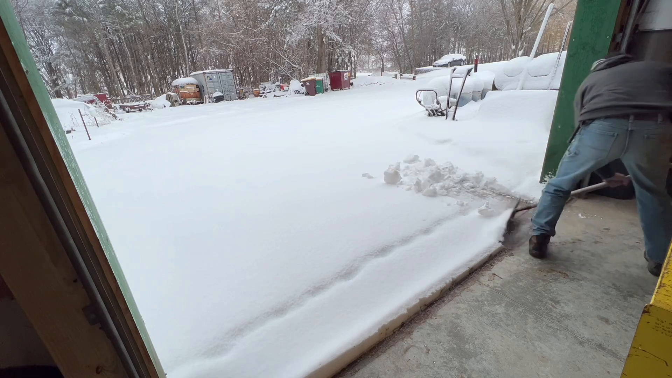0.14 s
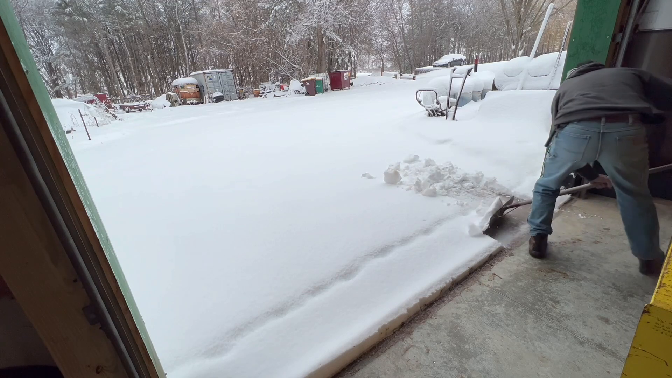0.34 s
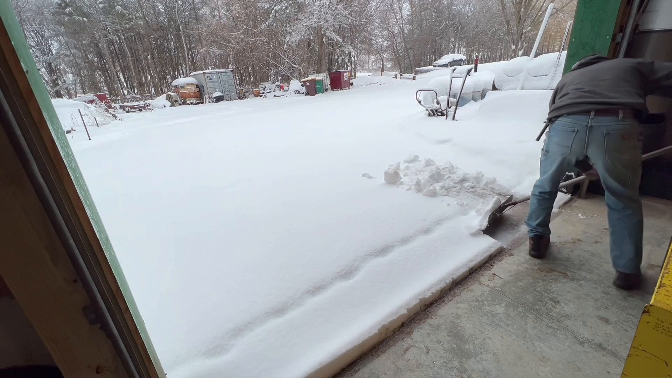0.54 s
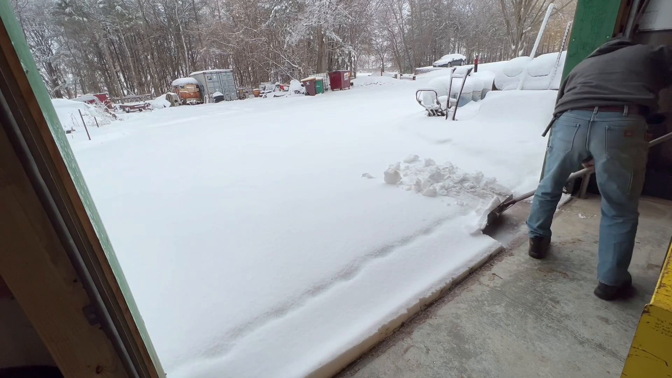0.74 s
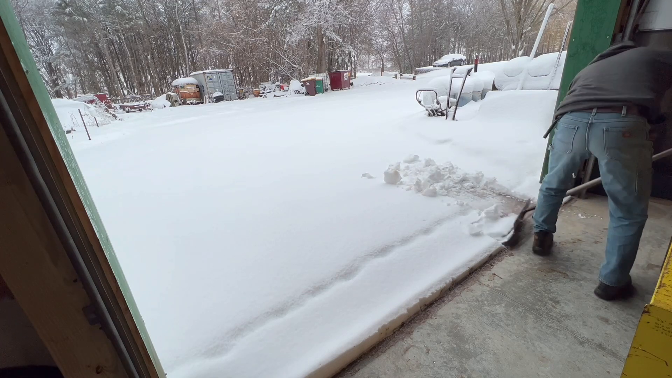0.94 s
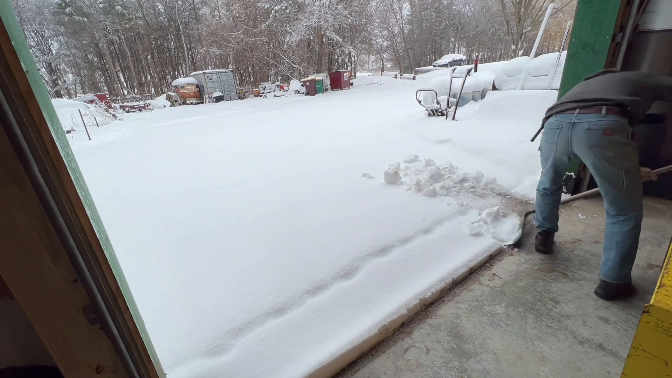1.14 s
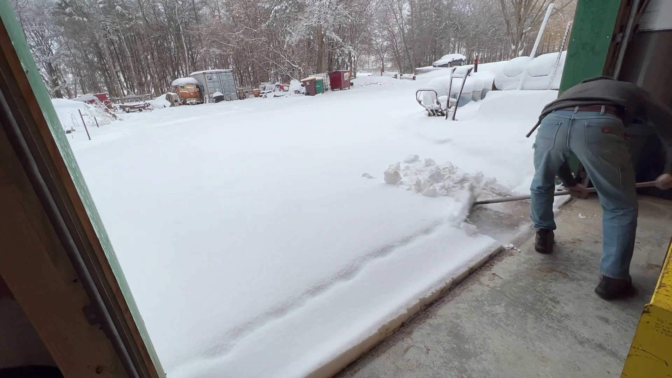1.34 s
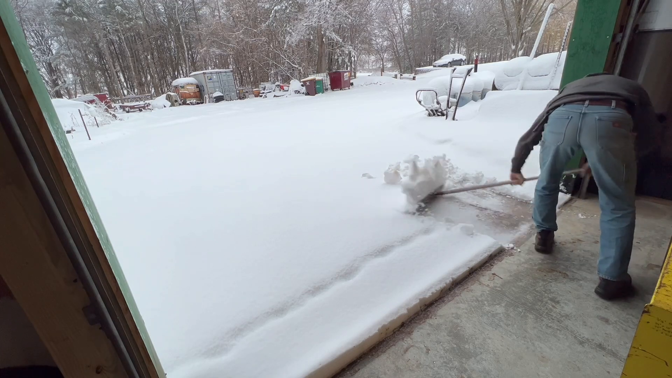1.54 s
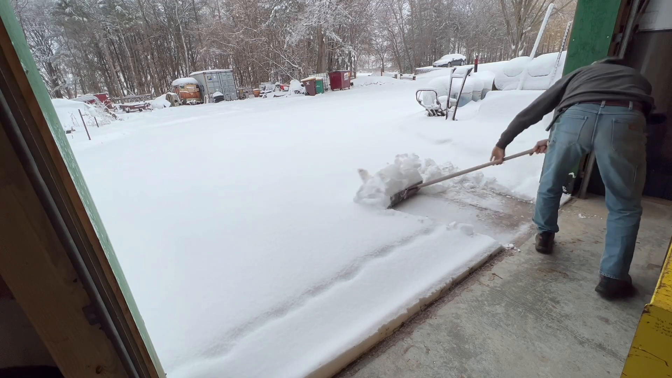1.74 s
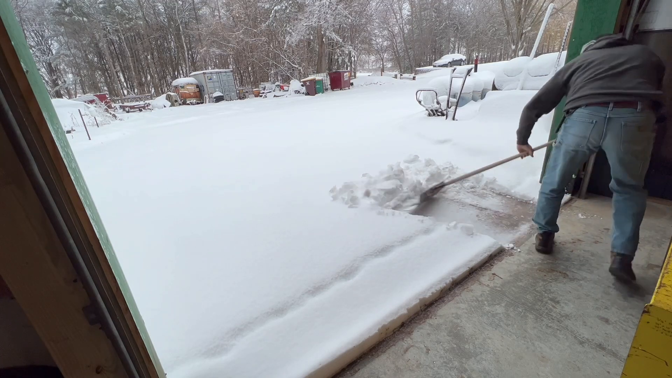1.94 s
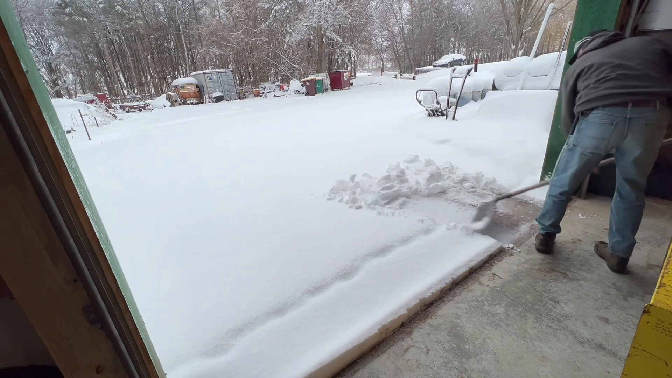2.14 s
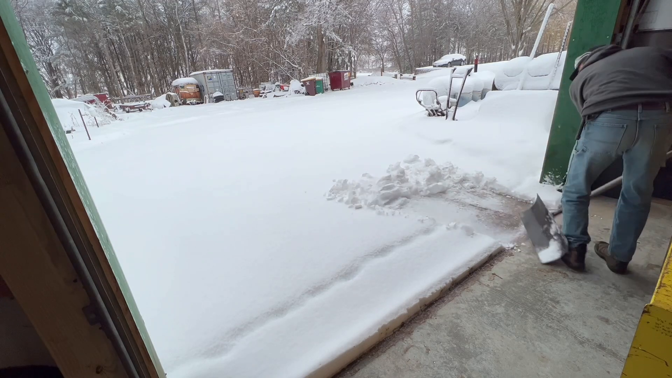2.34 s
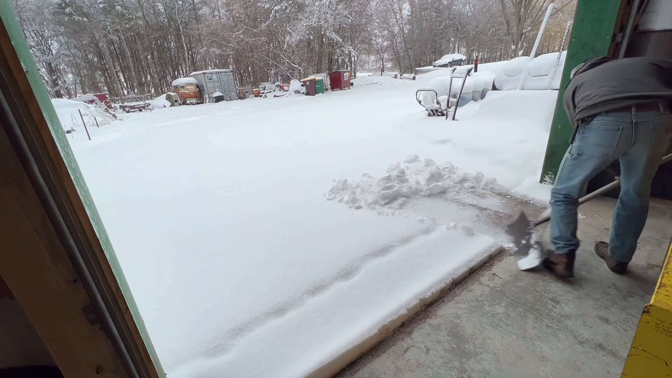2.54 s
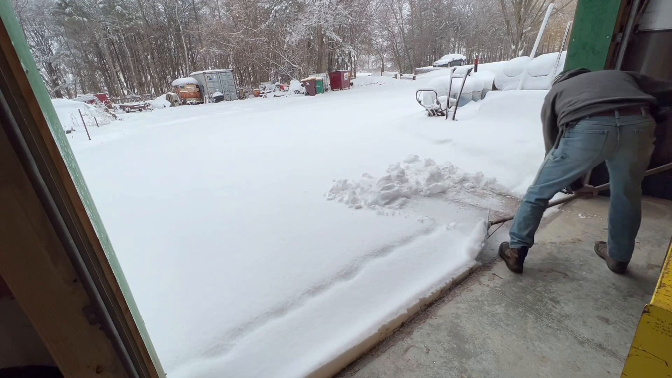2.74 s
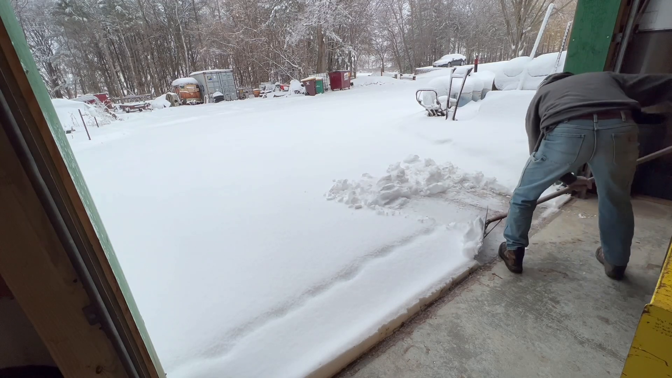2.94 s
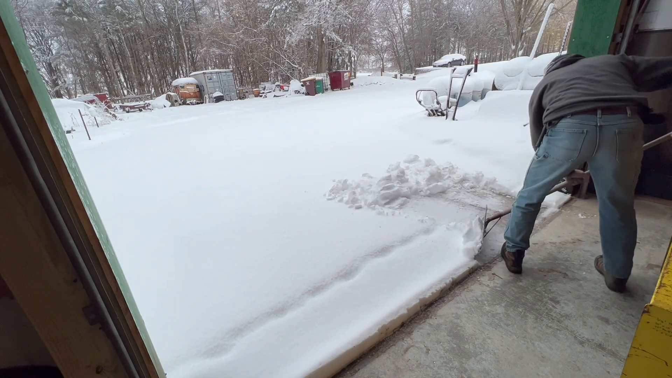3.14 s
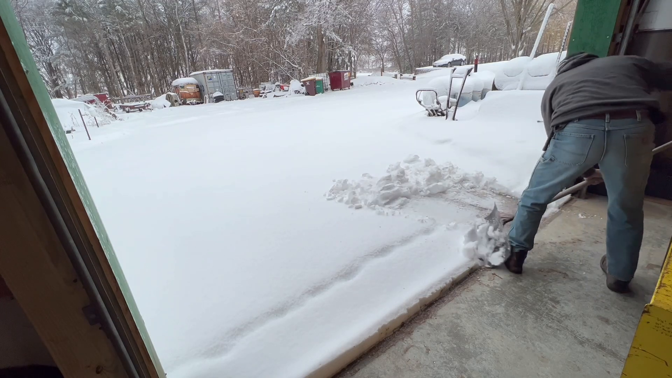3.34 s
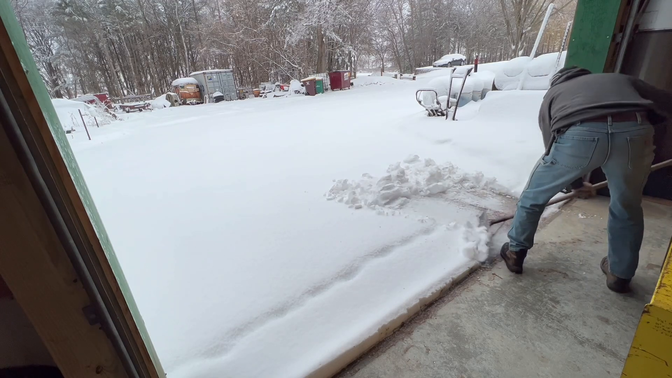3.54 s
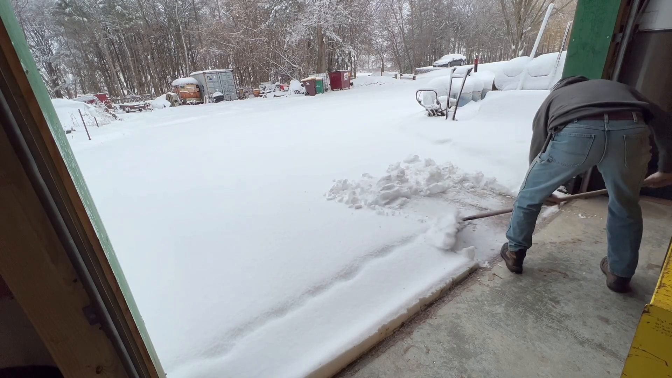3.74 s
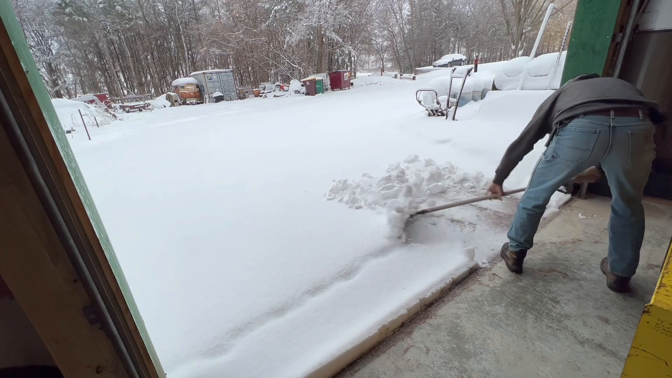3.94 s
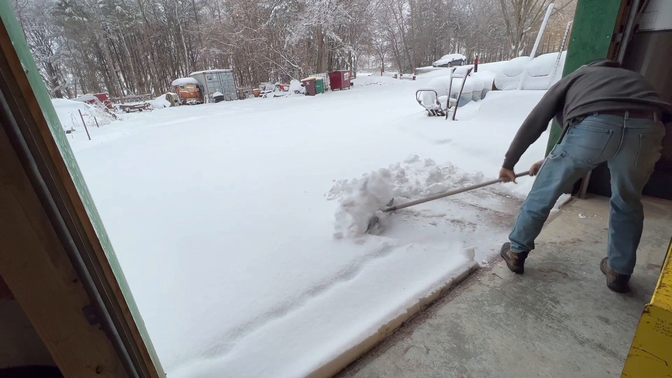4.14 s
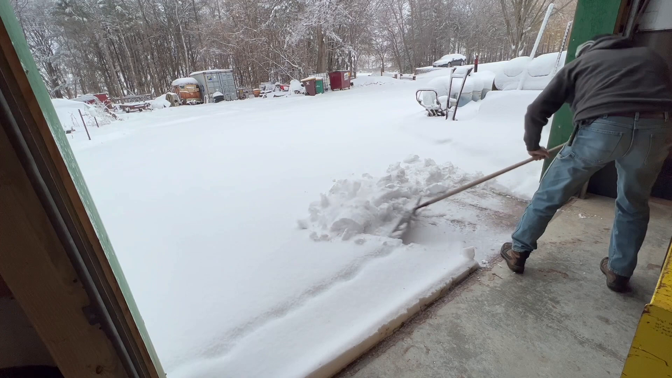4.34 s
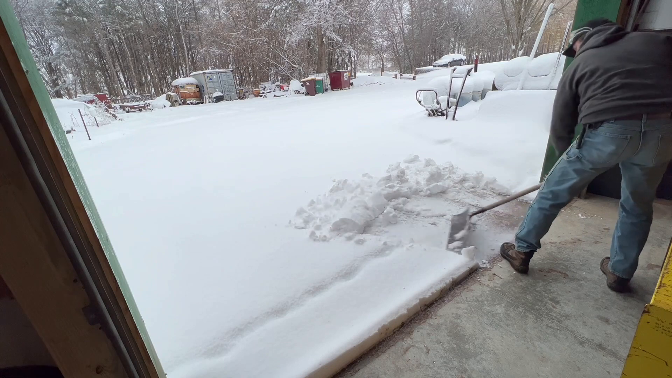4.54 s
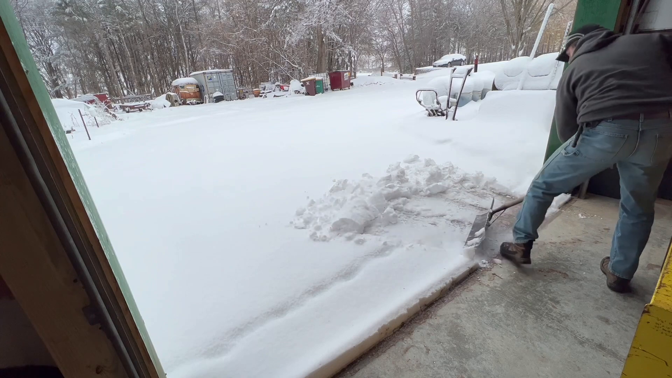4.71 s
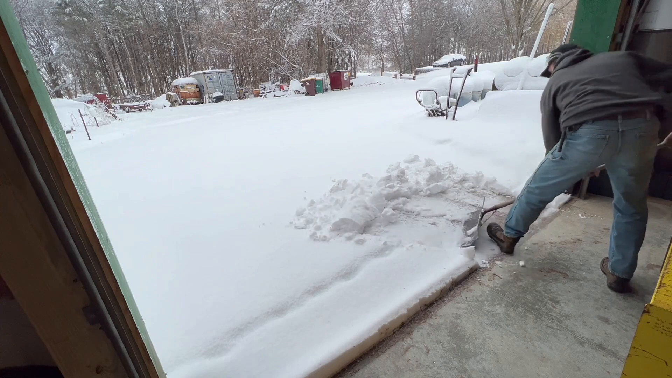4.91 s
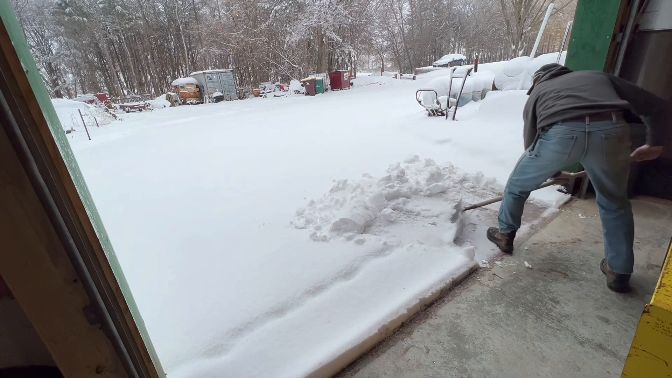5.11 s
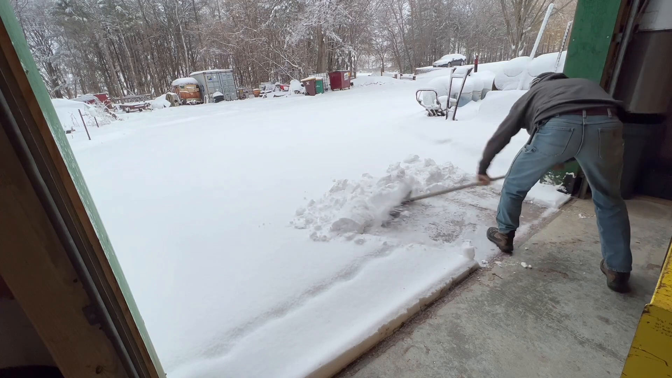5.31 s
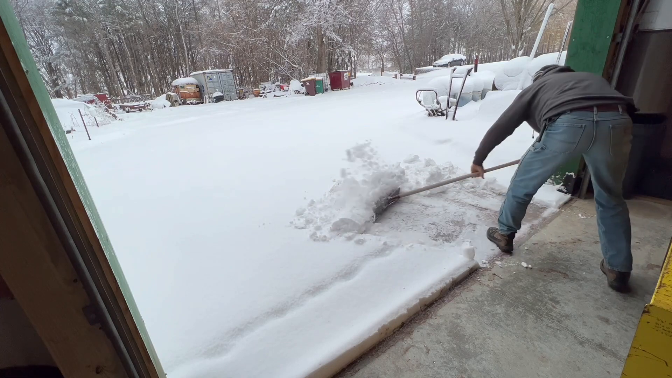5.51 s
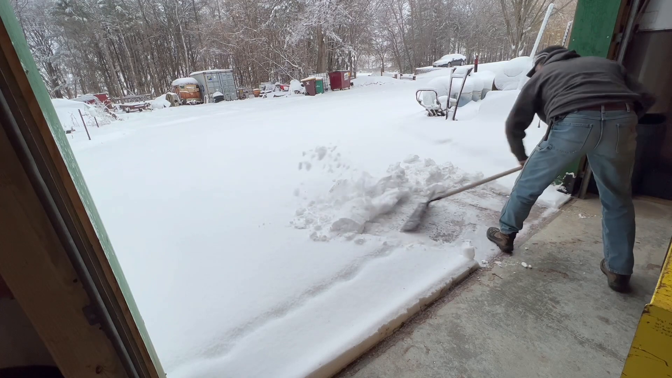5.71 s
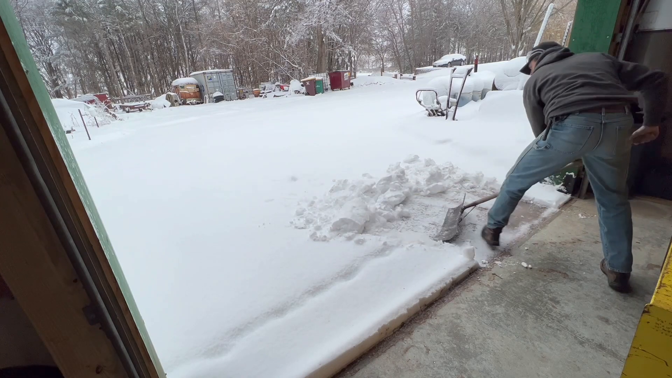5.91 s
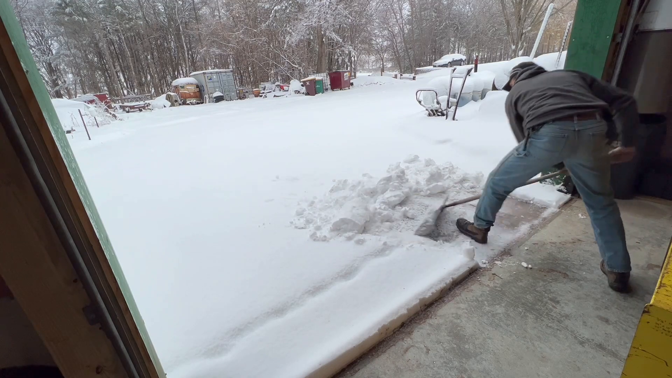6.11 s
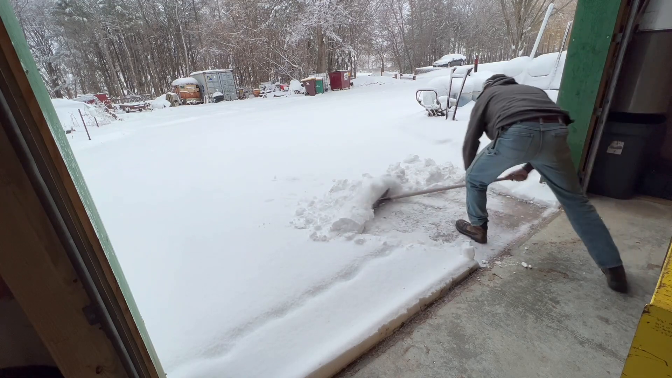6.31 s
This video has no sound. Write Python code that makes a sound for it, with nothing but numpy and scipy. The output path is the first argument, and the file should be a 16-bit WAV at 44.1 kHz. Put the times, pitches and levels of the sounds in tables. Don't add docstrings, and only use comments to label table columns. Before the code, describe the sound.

Rough, ringing shovel strokes rasp over a concrete slab and push crunchy snow, with soft boot thuds and one low hollow bump.

```python
import sys
import numpy as np
from scipy import signal
from scipy.fft import rfft, irfft, next_fast_len
from scipy.io import wavfile

SR = 44100
rng = np.random.default_rng(int(sys.argv[2]) if len(sys.argv) > 2 else 0)


def generate_wav(signal):
    frames = np.transpose(np.atleast_2d(signal))
    scaled = np.clip(frames, -1, 1) * 32767
    pcm = np.round(scaled).astype(np.int16)
    wavfile.write(sys.argv[1], SR, pcm)


def undo_db(level):
    steps = np.asarray(level, float) / 20
    return 10 ** steps


N = 285327

# time in seconds, edge contact in dB,
# snow load in dB against the contact.
SILL_PUSHES = [
    [(0, -19.5, -45), (.034, -16, -22.5), (.17, -24, -4.5), (.254, -32, 8), (.388, -72, -6),
     (.42, -74, -15)],
    [(.854, -37.5, -5), (.894, -30.5, -21), (.972, -29, -9.5), (1.024, -38.5, -10), (1.078, -52, 7),
     (1.1, -64, 1)],
    [(1.08, -41, 6), (1.134, -24.5, -13.5), (1.218, -23.5, -1), (1.262, -25, 0), (1.326, -27.5, -9),
     (1.408, -30.5, -1), (1.56, -32.5, -2), (1.738, -36.5, -0.5), (1.8, -90, 11)],
    [(2.524, -24, -19), (2.544, -17, -11.5), (2.585, -17.5, -24), (2.638, -16.5, -11.5), (2.702, -28.5, 3),
     (2.74, -30, -3), (2.79, -37.5, 16), (2.9, -55, 15)],
]
OUTER_PUSHES = [
    [(3.438, -36, -1), (3.5, -32.5, -10.5), (3.526, -19, -18.5), (3.616, -24, 2), (3.698, -28.5, -2.5),
     (3.892, -27, -7), (3.948, -23.5, -15.5), (4.06, -28, -1.5), (4.252, -49, -3)],
    [(4.803, -34.5, -41), (4.819, -27.5, -12), (4.901, -28, -5.5), (4.973, -32.5, -4.5),
     (5.069, -19.5, -11), (5.113, -22, -11), (5.271, -15, -18), (5.37, -27, -3), (5.52, -48, -4)],
    [(5.94, -63, -4), (5.97, -35.5, -12), (6.089, -25, -16.5), (6.159, -16, -19), (6.287, -22.5, -7.5),
     (6.38, -30.5, -1), (6.47, -29.5, -4)],
]
PUSH_TILTS_DB = [5, 2, 4.5, 5, 2.5, -1.5, -2.5]
# peak time in seconds, level in dB, rise in seconds,
# fall in seconds (both span 20 dB), snow load in dB.
SCUFFS = [(0.471, -39, 0.26, 0.16, -15), (.624, -47.5, 0.11, 0.11, -12), (.7, -47, 0.16, 0.031, -7),
          (.78, -45, 0.035, 0.95, -3), (1.92, -42.5, 0.41, 0.11, -18), (2.103, -46, 0.0026, 0.079, 6.5),
          (2.298, -40, 0.029, 0.11, -19), (2.411, -45.5, 0.14, 0.045, 13), (2.433, -18, 0.0022, 0.018, -3),
          (2.956, -39, 0.13, 0.26, 0), (3.14, -51, 0.11, 0.028, -28), (3.376, -49, .004, 0.036, 15),
          (4.277, -30, 0.011, 0.036, -23), (4.41, -49.5, 0.41, 0.084, -11),
          (4.529, -31.5, 0.045, 0.02, -18), (4.604, -41, 0.0035, 0.023, -7), (5.533, -31, 0.039, .06, -8.5),
          (5.604, -29, 0.055, 0.1, -13), (5.71, -34, 0.099, 0.038, -47), (5.782, -17.5, 0.044, 0.037, -37),
          (5.889, -14.5, 0.022, 0.02, -17.5)]
SCUFF_TILT_DB, USUAL_LOAD_DB = -3.5, -9

# level in dB against the contact, share of the load swing.
HISS_LAW = (0.3, -0.12)
RING_LAW = (-1.25, 0.16)
SNOW_LAW = (-9.5, 0.75)
SLAB_LAW = (-17, 0.28)
BITE_AT_DB, BITE_PER_DB, BITE_PER_LOAD = -24, -0.2, -0.068
RING_PER_TILT, RASP_PER_TILT = -0.041, -1.24
HEAP_LAG_S = 0.063

# start in seconds, peak in dB, t60 in seconds.
CATCHES = [
    (0.856, -44, 0.2),
    (1.207, -39, 0.053),
    (2.103, -34, 0.11),
    (2.436, -26, 0.014),
    (2.523, -31, 0.097),
    (3.376, -42.5, 0.027),
    (3.438, -41, 0.055),
    (4.279, -29, 0.018),
    (4.604, -41.5, 0.028),
    (4.806, -36.5, .1),
]
# start in seconds, level in dB, t60 in seconds.
RATTLE = (2.76, -39, 1.6)

# frequency in Hz, level in dB per Hz.
GRIT_SPECTRUM = [(1500, -30), (2400, 0.5), (3200, -6), (4500, -5), (6200, -9.5), (8600, -5), (10000, -6.5),
                 (12000, -10.5), (14500, -4), (16000, -15)]
# frequency in Hz, width in Hz, level in dB.
EDGE_MODES = [(4800, 43, -51), (4750, 150, -51), (5740, 1800, 9)]
# frequency in Hz, level in dB per Hz.
BODY_SPECTRUM = [(290, -32), (500, -10.5), (626, -5), (772, 5), (1120, -4), (1510, 0), (3200, -8.5),
                 (4160, -7.5), (7040, -120)]
# frequency in Hz, width in Hz, level in dB.
BLADE_MODES = [(820, 276, -0.5), (800, 190, 0), (850, 7.4, -11), (964.5, 39, 6), (1050, 57, -21),
               (1384, 4, 3.5), (1500, 98, -12), (1552, 12, 7), (1740, 23, -25), (1970, 23, 4.5),
               (2125, 140, -16), (2780, 14, 0.5)]
# frequency in Hz, level in dB per Hz.
SNOW_SPECTRUM = [(110, -39), (180, -4), (237, -5.5), (459, 0.5), (543, -2), (800, -6), (1040, -17),
                 (1760, -120)]
# frequency in Hz, level in dB per Hz.
SLAB_SPECTRUM = [(15, -25), (25, -9), (75, -5.5), (135, -4), (238, 0.5), (280, -10), (360, -2), (620, -120)]

# peak time in seconds, frequency in Hz, level in dB, length in seconds.
SINGS = [(0.046, 1577, -24.5, 0.02), (0.206, 801, -24, 0.084), (.42, 1000, -77, 0.027),
         (0.904, 925, -30, 0.033), (0.996, 800, -31, 0.04), (1.213, 1500, -14, 0.012),
         (1.236, 760, -22, 0.043), (2.44, 806, -35, 0.044), (2.624, 1500, -12, 0.007),
         (2.694, 809, -10.5, 0.015), (3.389, 1500, -44.5, 0.017), (3.627, 800, -18.5, 0.015),
         (4.39, 950, -50, 0.046), (4.913, 812, -22, 0.042), (4.978, 856, -24.5, 0.094),
         (5.101, 780, -15.5, 0.013), (5.61, 1740, -28, 0.03), (5.63, 984, -32, 0.082),
         (5.787, 1757, -23, 0.035), (5.9, 1272, -31, 0.017), (6.02, 850, -29, 0.041),
         (6.174, 1500, -20.5, 0.032), (6.27, 799, -14, 0.011), (6.417, 828, -22, 0.025)]
# start in seconds, peak in dB, pitch in Hz, t60 in seconds.
THUDS = [
    (.771, -20.5, 328, 0.013),
    (0.793, -50, 322, .05),
    (1.244, -27, 257, 0.33),
    (1.251, -19, 464, 0.13),
    (2.107, -23.5, 260, 0.0092),
    (3.445, -37.5, 89.5, .2),
    (4.039, -21.5, 232, 0.079),
    (4.532, -47, 343, 0.11),
    (5.577, -41, 164, 0.29),
]
# time in seconds, level in dB.
BUMPS = [
    (2.771, -23.5),
    (2.779, -13),
    (2.788, -19.5),
]
# frequency in Hz, level in dB, t60 in seconds.
PANEL_MODES = [(84.3, -4, 0.75), (96, -17, 1.2), (129, 2, .36), (133, -8, 0.85), (190.3, -8, 1.5),
               (198, -12, 1.2), (292, -17, 0.3), (320, -18, .4), (356, -16, 0.7), (450, -11, .25),
               (510, -5, 0.25)]

# frequency in Hz, t60 in seconds.
GARAGE_T60 = [(60, 0.96), (500, 0.57), (850, 0.47), (3000, 0.46), (10000, 0.33)]
GARAGE_DB, LATE_DB, NEAR_WALLS_T60_S = 1.5, -13, 0.041
SHARED_BELOW_HZ, WALL_CUT_HZ = 350, 13700
SPOT_S = 0.17

# frequency in Hz, level in dB per Hz.
AIR_SPECTRUM = [(35, -38), (60, 2.5), (208, 2), (719, -13), (938, -7), (10000, -12.5), (12000, -13),
                (15600, -76), (22000, -120)]
AIR_DB = -57

# frequency in Hz, left lead in radians.
PORT_PHASE = [(0, 0), (250, -.8), (700, -2.4), (1300, -1.6), (3270, -1.6), (4400, -2.2), (6200, -5.2),
              (9650, -8.0), (11000, -12.2), (12800, -14.3), (15200, -18.6)]
# frequency in Hz, left minus right in dB.
PORT_LEAN = [(60, -7), (110, 3), (200, -2), (380, -1), (700, -2), (1290, -2), (2380, -1.5), (4400, 5),
             (8120, 1.5), (15000, -4)]
# frequency in Hz, gain in
# dB.
OVERALL_COLOUR = [(20, -36), (45, -9), (75, 0), (9200, 0), (9600, -8), (9900, -13), (10600, -12), (10900, -3),
                  (12900, -5), (13200, -70), (14300, -70), (14500, -8), (15700, -10), (15900, -90)]


def scrape():
    edge_db, load, tilt = contact()
    laws = (HISS_LAW, RING_LAW, SNOW_LAW, SLAB_LAW)
    hiss_db, ring_db, snow_db, slab_db = [edge_db + db + share * load for db, share in laws]
    bite_db = BITE_PER_DB * (edge_db - BITE_AT_DB) + BITE_PER_LOAD * load + tilt
    bite_db = np.clip(bite_db, -10, 10)
    ring_db = ring_db + RING_PER_TILT * tilt
    judder = undo_db(1.3 * drift(30))
    catch = sum(dying(*row) for row in CATCHES)

    grit = colour(grains(9000, 1.17, 2.1, 83), GRIT_SPECTRUM)
    top = band_pass(grit, 4700, 8200, order=1)
    rasp = band_pass(grit, 3300, 5200, order=1)
    grit = grit + top * (undo_db(bite_db) - 1) + rasp * (undo_db(RASP_PER_TILT * tilt) - 1)
    grit = rms_one(grit + undo_db(3.5) * resonate(grit, EDGE_MODES, wander_db=-3.5))

    knocks = grains(4000, 1.07, 2.0, 27)
    modes = rms_one(resonate(knocks, BLADE_MODES, wander_db=2.8))
    blade = rms_one(colour(knocks, BODY_SPECTRUM) + undo_db(-5) * modes)

    snow = colour(grains(900, 0.93, 3.25, 19.6), SNOW_SPECTRUM)

    keep = np.exp(-1 / (HEAP_LAG_S * SR))
    heap = signal.lfilter([1 - keep], [1, -keep], undo_db(slab_db), zi=[undo_db(slab_db[0])])[0]
    rumble = (heap + dying(*RATTLE)) * colour(rng.standard_normal(N), SLAB_SPECTRUM)

    out = grit * (undo_db(hiss_db) * judder + undo_db(5.5) * catch)
    out += blade * (undo_db(ring_db) * judder + undo_db(2.5) * catch)
    return out + undo_db(snow_db) * snow + rumble


def contact():
    time = np.arange(N) / SR
    force, loaded, tilted = np.full(N, 1e-6), np.zeros(N), np.zeros(N)
    for rows, tilt in zip(SILL_PUSHES + OUTER_PUSHES, PUSH_TILTS_DB):
        s, db, load = np.transpose(rows)
        push = undo_db(np.interp(time, s, db, left=-140, right=-140))
        force = force + push
        loaded = loaded + push * (np.interp(time, s, load) - USUAL_LOAD_DB)
        tilted = tilted + push * tilt
    for s, db, rise, fall, load in SCUFFS:
        age = np.maximum((s - time) / rise, (time - s) / fall)
        scuff = undo_db(db) * np.exp(-np.log(10) * age)
        force = force + scuff
        loaded = loaded + scuff * (load - USUAL_LOAD_DB)
        tilted = tilted + scuff * SCUFF_TILT_DB
    return 20 * np.log10(force), loaded / force, tilted / force


def sings():
    time, out = np.arange(N) / SR, np.zeros(N)
    wobble = np.cumsum(8.56 * drift(25.8)) / SR
    for s, hz, db, length in SINGS:
        near = np.abs(time - s) < 4 * length
        swell = np.exp(-((time[near] - s) / length) ** 2)
        out[near] += undo_db(db) * swell * np.sin(2 * np.pi * (hz * time[near] + wobble[near]))
    return out * undo_db(3.84 * drift(100))


def thuds():
    out = np.zeros(N)
    for s, db, hz, t60 in THUDS:
        click = 1.0 * (np.arange(N) == round(s * SR))
        out += undo_db(db) * ring(click, hz, t60)
    soft = signal.lfilter([0.08], [1, -0.92], out)
    return signal.lfilter([0.15], [1, -0.85], soft)


def panel():
    clicks = np.zeros(N)
    for s, db in BUMPS:
        clicks[round(s * SR)] = undo_db(db)
    clicks = np.convolve(clicks, np.hanning(120) / 60)[:N]
    boom = sum(undo_db(db) * ring(clicks, hz, t60) for hz, db, t60 in PANEL_MODES)
    return high_pass(boom, 75, order=2)


def garage(x, count=4):
    age, tail = np.arange(SR) / SR, 0
    edges = 45 * 2.0 ** np.arange(9.5)
    white = rng.standard_normal((2, 2, count, SR))
    for k, (low, high) in enumerate(zip(edges, np.minimum(edges[1:], 0.45 * SR))):
        band = band_pass(white[k % 2], low, high, order=2)
        near = undo_db(-60 * age / NEAR_WALLS_T60_S)
        late = undo_db(LATE_DB - 60 * age / at_hz(GARAGE_T60, np.sqrt(low * high)))
        tail = tail + band * (near + late)
    tail = tail * np.clip((age - 0.003) / 0.0056, 0, 1)
    mid, side = tail / np.sqrt(np.mean(np.sum(tail ** 2, axis=-1)))
    cut = high_pass(side, SHARED_BELOW_HZ, order=1)
    side = cut + 0.08 * (side - cut)

    before = x[SR // 4:0:-1] * undo_db(-10)
    x = np.r_[before, x]
    spot = np.arange(len(x)) / SR / SPOT_S - np.arange(count)[:, None]
    distance = np.abs((spot + count / 2) % count - count / 2)
    share = np.cos(np.pi / 2 * np.minimum(distance, 1))
    size = next_fast_len(len(x) + SR)
    answers = np.array([mid + side, mid - side]) / np.sqrt(2)
    heard = rfft(x * share, size) * rfft(answers, size)
    return irfft(heard.sum(axis=1), size)[:, len(before):N + len(before)]


def still_air():
    return undo_db(AIR_DB) * colour(rng.standard_normal((2, N)), AIR_SPECTRUM)


def ports(x):
    size = next_fast_len(N + 512)
    hz = np.arange(size // 2 + 1) * SR / size
    half = np.exp(0.5j * np.interp(hz, *np.transpose(PORT_PHASE)))
    return irfft(rfft(x, size) * np.array([half, 1 / half]), size)[:, :N]


def grains(per_s, spread_db, clump_db, clump_hz):
    sizes = undo_db(spread_db * np.minimum(rng.exponential(1, N), 5)) * rng.choice([-1, 1], N)
    struck = rng.random(N) < per_s / SR
    return sizes * struck * undo_db(clump_db * drift(clump_hz))


def resonate(x, modes, wander_db):
    out = np.zeros(N)
    for k, (hz, width, db) in enumerate(modes):
        drive = x * undo_db(db + wander_db * drift(4.15))
        out += (-1) ** k * peak(drive, hz, width)
    return out


def peak(x, hz, width_hz):
    r = np.exp(-np.pi * width_hz / SR)
    poles = [1, -2 * r * np.cos(2 * np.pi * hz / SR), r * r]
    return signal.lfilter((1 - r * r) / 2 * np.array([1, 0, -1]), poles, x)


def ring(clicks, hz, t60_s):
    r, w = undo_db(-60 / (t60_s * SR)), 2 * np.pi * hz / SR
    return signal.lfilter([0, np.sin(w)], [1, -2 * r * np.cos(w), r * r], clicks + 1e-18)


def dying(start_s, db, t60_s):
    age = np.arange(N) / SR - start_s
    return undo_db(db - 60 * np.maximum(age, 0) / t60_s) * np.clip(age / 0.00089, 0, 1)


def drift(rate_hz):
    r = np.exp(-2 * np.pi * rate_hz / SR)
    noise = rng.standard_normal(N + SR)
    return rms_one(signal.lfilter([1], [1, -2 * r, r * r], noise)[SR:])


def colour(x, spectrum):
    size = next_fast_len(N)
    hz = np.arange(size // 2 + 1) * SR / size
    return rms_one(irfft(rfft(x, size) * undo_db(at_hz(spectrum, hz)), size)[..., :N])


def at_hz(points, hz):
    table = np.array(points, float)
    return np.interp(np.log(hz + 1), np.log(table[:, 0] + 1), table[:, 1])


def rms_one(x):
    return x / np.sqrt(np.mean(x ** 2) + 1e-20)


def band_pass(x, low_hz, high_hz, order):
    return signal.sosfilt(signal.butter(order, [low_hz, high_hz], "band", fs=SR, output="sos"), x)


def high_pass(x, hz, order):
    return signal.sosfilt(signal.butter(order, hz, "high", fs=SR, output="sos"), x)


def scene():
    shovel = undo_db(-1.5) * scrape() + thuds()
    tones, boom = sings(), panel()
    echoes = garage(shovel + undo_db(-7) * tones + undo_db(-10) * boom)
    walls = signal.butter(4, WALL_CUT_HZ, fs=SR, output="sos")
    echoes = signal.sosfilt(walls, echoes)
    return ports(shovel + tones) + boom + undo_db(GARAGE_DB) * echoes + still_air()


def roll_off(x):
    return signal.sosfilt(signal.butter(12, 17090, fs=SR, output="sos"), x)


def record(dry):
    size = next_fast_len(N + 4096)
    hz = np.arange(size // 2 + 1) * SR / size
    lean_db = at_hz(PORT_LEAN, hz) * np.array([[0.5], [-0.5]])
    gain = undo_db(at_hz(OVERALL_COLOUR, hz) + lean_db)
    rounded = 0.9 * np.tanh(dry / 1.02)
    heard = irfft(rfft(rounded, size) * gain, size)[:, :N]
    return roll_off(heard)


dry = scene()
out = record(dry)
generate_wav(out)
```